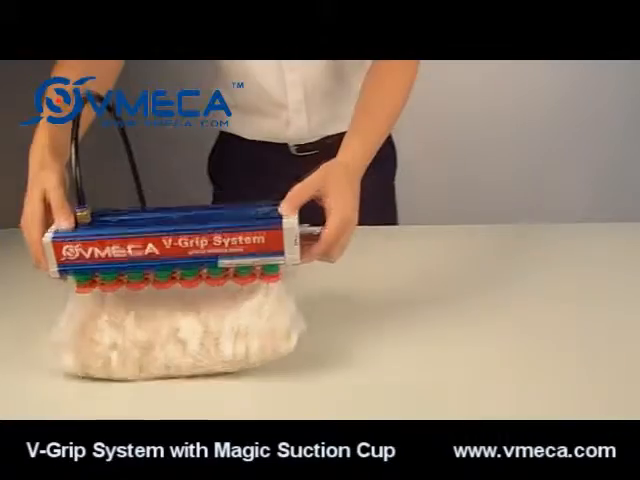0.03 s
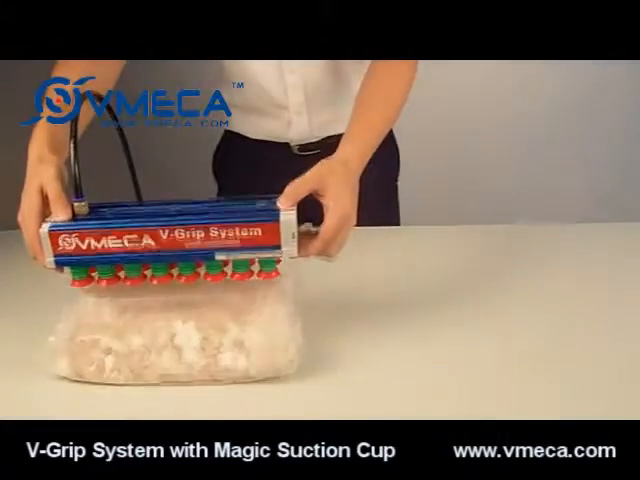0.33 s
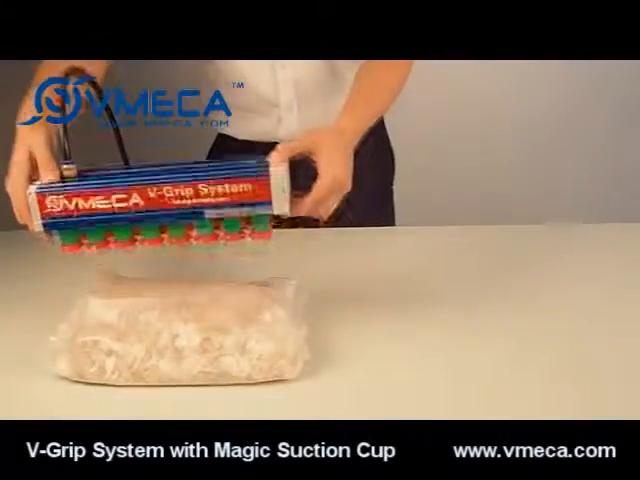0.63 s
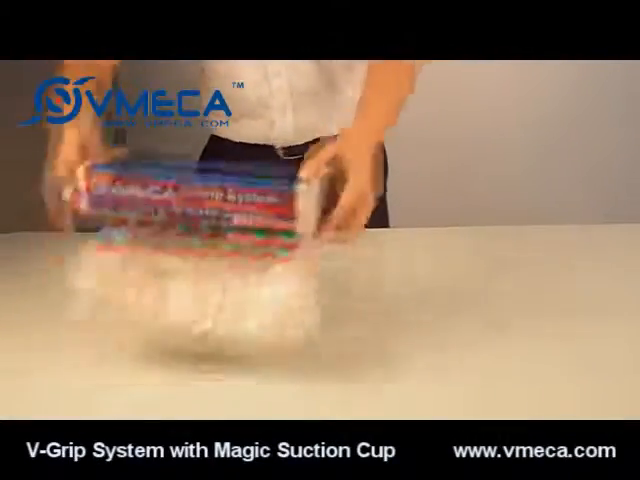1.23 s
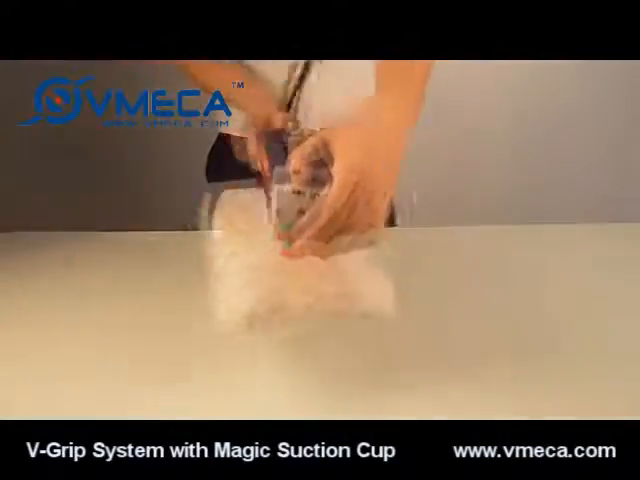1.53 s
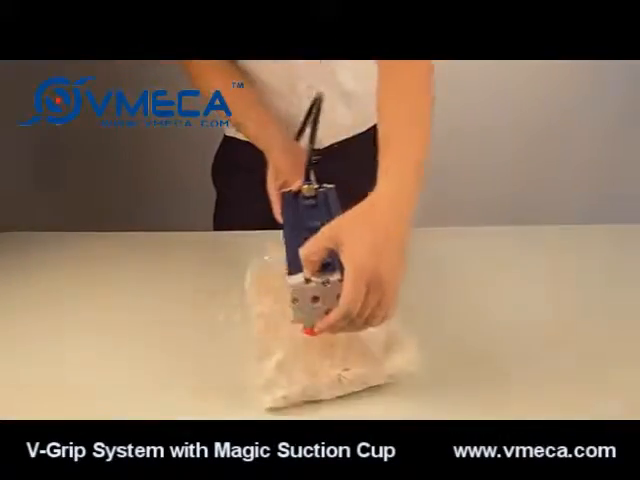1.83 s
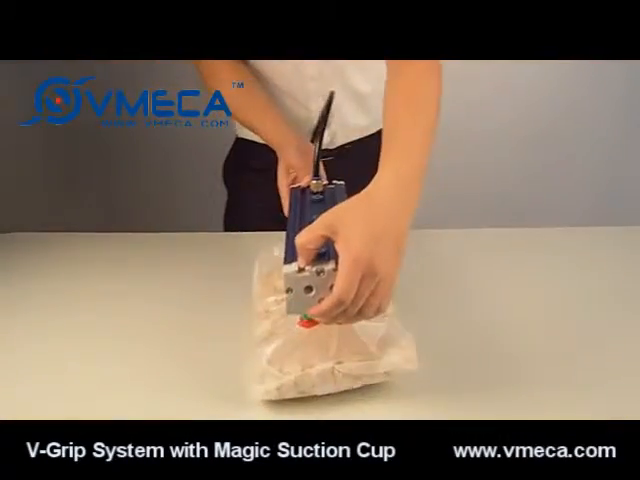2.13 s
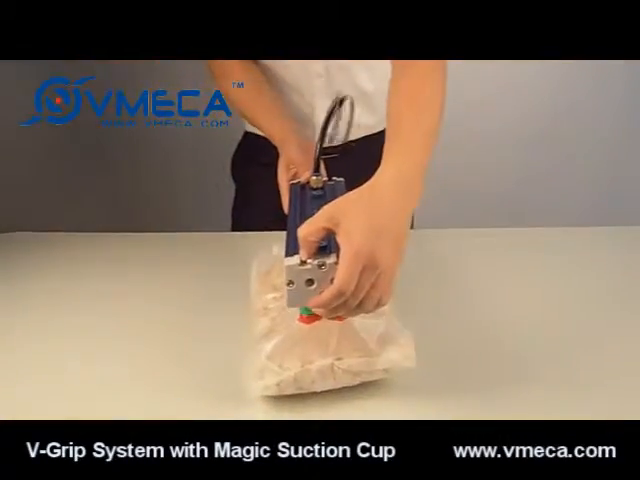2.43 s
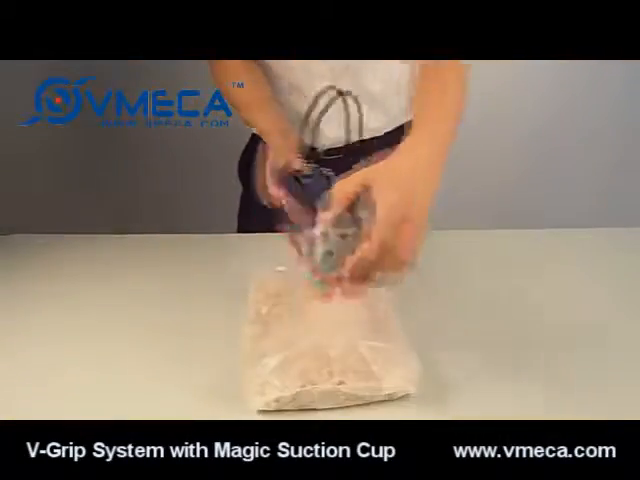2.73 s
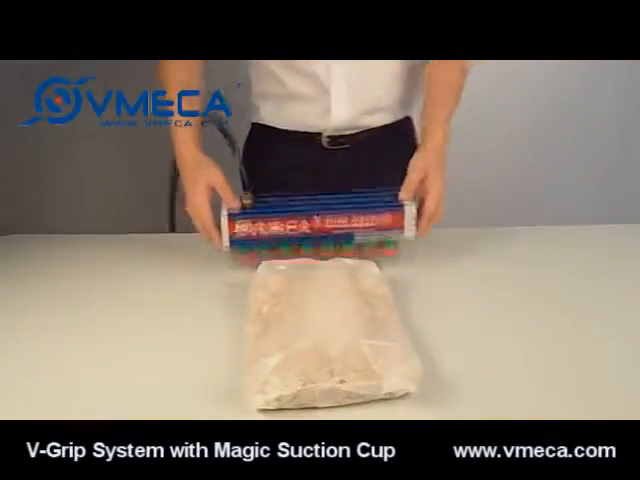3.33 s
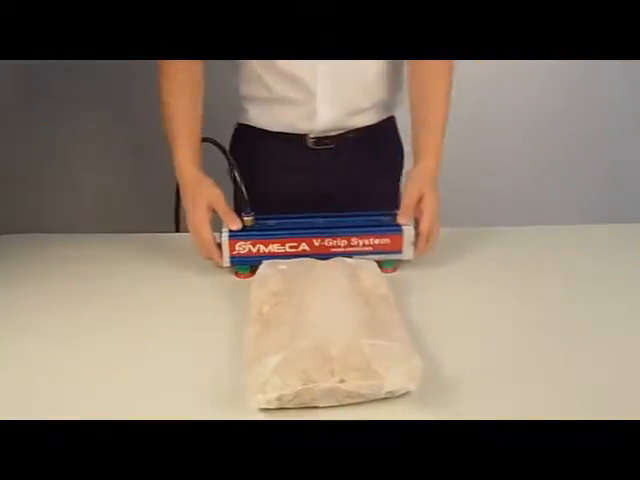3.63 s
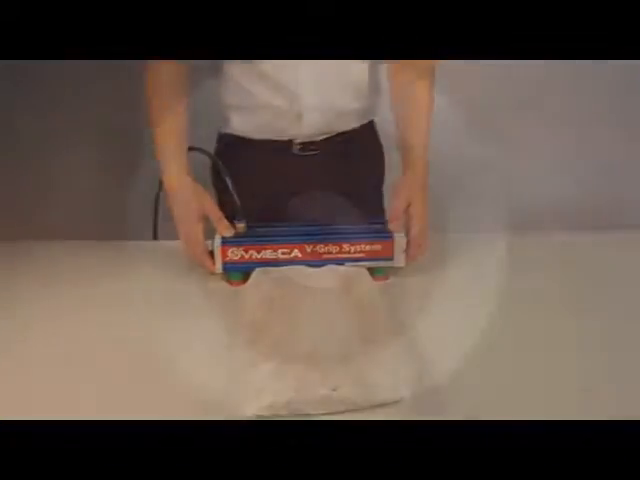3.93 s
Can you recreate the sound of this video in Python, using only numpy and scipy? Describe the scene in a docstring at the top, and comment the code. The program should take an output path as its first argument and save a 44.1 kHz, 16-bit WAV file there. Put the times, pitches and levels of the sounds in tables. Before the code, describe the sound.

Compressed air hisses loudly through a vacuum gripper, with valve puffs, clacks and plastic crinkling.

```python
"""Vacuum gripper handling a bag.

A compressed-air gripper drops a bag on a table, grips it again, turns it and lets it go.
Air rushes and whistles past the cups while they hold; at each release a valve puffs, squeals and
opens into a bright hiss. The gripper clacks on landing, plastic crinkles, the air fades to room hum."""
import sys
import numpy as np
from scipy import signal
from scipy.fft import rfft, irfft, next_fast_len
from scipy.io import wavfile
from scipy.ndimage import map_coordinates

SR = 44100
rng = np.random.default_rng(int(sys.argv[2]) if len(sys.argv) > 2 else 0)


def output_pcm(signal):
    """Save a mono or channel-first signal as 16-bit PCM at the path in sys.argv[1].

    Samples are clipped to [-1, 1] before scaling.
    """
    pcm = np.clip(np.atleast_2d(signal).T, -1, 1) * 32767
    wavfile.write(sys.argv[1], SR, np.round(pcm).astype(np.int16))


N = 176400


def suction():
    """Air rushes in between the cups and the fluttering plastic, and hoots faintly at the lip gaps."""
    # time_s, rush_db, hiss_db, treble_db
    first_grip = [(0.0, -31.5, -35, -30.5), (0.074, -31.5, -37, -30), (0.14, -29, -36, -28)]
    second_grip = [(0.93, -36, -31, -31), (0.988, -33, -32, -29.5), (1.176, -26, -26.5, -27.5),
                   (1.224, -28.5, -34, -37), (1.328, -31, -30.5, -28.5), (1.41, -34.5, -39.5, -36),
                   (1.534, -37, -43, -38), (1.708, -26.5, -33.5, -28), (1.904, -28, -32.5, -27),
                   (2.148, -30.5, -35.5, -31), (2.32, -28.5, -34.5, -28.5)]
    # start_s, end_s
    grips = [(-0.1, 0.156), (0.93, 2.34)]
    # freq_hz, density_db
    spectrum = [(70, -16.5), (200, -12), (400, -5), (700, -7.5), (1050, -1), (1700, -1), (2500, -3),
                (3000, -3.5), (3700, -4.5), (4300, -3), (5200, -6.5), (9000, -8.5), (13500, -6.5),
                (15000, -10.5)]
    # freq_hz, width_hz, peak_db
    cup_modes = [(1258, 13, -7.5), (1620, 76, -2), (1950, 32, 0)]
    # start_s, hold_s, centre_hz, width_hz, level_db
    leaks = [(-0.05, .19, 1490, 550, -33), (0.89, 0.055, 720, 340, -38), (1.68, 0.63, 2490, 240, -35.5)]
    air = close_reflections(noise(spectrum, cup_modes, grain_db=2.0))
    rush = airflow(air, [first_grip, second_grip], grips, flutter_db=0.48, flutter_hz=55)
    for start_s, hold_s, centre_hz, width_hz, level_db in leaks:
        hoot = filtered(rng.standard_normal(N), lambda hz: resonance(hz, centre_hz, width_hz))
        rush = rush + amp(level_db) * unit(hoot) * burst(start_s, 0.013, hold_s, 0.39)
    return amp(-0.5) * rush


def blow_off():
    """Air jets out through the open nozzles at each release."""
    # time_s, rush_db, hiss_db, treble_db
    first_release = [(0.2, -40, -31.5, -22.5), (0.294, -45, -34, -28), (0.45, -44, -35.5, -32),
                     (0.566, -33, -29, -27.5), (0.734, -41, -36.5, -34.5), (0.83, -38, -35, -35)]
    second_release = [(2.38, -38, -33, -24), (2.528, -45.5, -34.5, -28.5), (2.76, -35.5, -31, -29.5),
                      (2.838, -38, -34, -34), (3.006, -33.5, -31.5, -32.5), (3.36, -48, -52, -62.5),
                      (3.444, -52, -57, -82), (3.68, -74, -72, -88)]
    # start_s, end_s
    releases = [(0.188, 0.93), (2.368, 3.7)]
    # freq_hz, density_db
    spectrum = [(100, -22), (300, -11), (1500, -7), (3300, -6.5), (4200, -0.5), (4750, -2.5), (5250, 4.5),
                (8500, -4), (11700, -8.5), (13400, -7.5), (15000, -15)]
    # freq_hz, width_hz, peak_db
    nozzle_modes = [(5180, 120, -2), (5940, 70, -1), (6600, 400, -4), (9300, 400, -4)]
    air = close_reflections(noise(spectrum, nozzle_modes, grain_db=1.5))
    jet = airflow(air, [first_release, second_release], releases, flutter_db=0.54, flutter_hz=45)
    return amp(1.0) * jet


def airflow(air, tables, spans, flutter_db, flutter_hz, switch_s=0.025):
    """A valve gates the stream; its rush, hiss and treble each follow a level curve."""
    # low_hz, high_hz, core_low_hz, core_high_hz
    bands = [(1, 3300, 900, 3000), (3300, 7800, 3800, 5700), (7800, 30000, 8000, 15000)]
    t = clock()
    band_gains = out = 0
    for (start_s, end_s), table in zip(spans, tables):
        opening = np.clip(np.minimum(t - start_s, end_s - t) / switch_s + .5, 0, 1)
        band_gains = band_gains + np.sqrt(opening) * amp(curves(table))
    for gain, (low_hz, high_hz, core_low_hz, core_high_hz) in zip(band_gains, bands):
        band = filtered(air, lambda hz: rolloff(hz, high_hz, 8) - rolloff(hz, low_hz, 8))
        core = filtered(air.mean(0), lambda hz: (hz > core_low_hz) & (hz < core_high_hz))
        out = out + gain * band / core.std()
    return out * amp(flutter_db * wobble(flutter_hz))


def whistle(octave_db=-4, breath_db=-10, breath_hz=350):
    """A leaking cup lip sounds an unsteady, airy edge tone and its octave."""
    # time_s, pitch_hz, level_db
    contour = [(1.722, 6060, -43), (1.735, 6110, -32), (1.755, 6290, -37), (1.797, 6280, -32),
               (1.85, 5980, -35), (1.866, 6050, -50), (1.945, 6100, -42), (1.975, 6400, -30),
               (2.005, 6500, -28), (2.085, 6290, -35), (2.112, 6570, -34), (2.155, 6730, -37),
               (2.212, 6710, -31.5), (2.256, 6600, -41), (2.285, 6560, -34), (2.33, 6570, -39)]
    pitch_hz, level_db = curves(contour)
    start_s, end_s = contour[0][0], contour[-1][0]
    waver = 1 + 0.004 * wobble(90) + 0.0082 * wobble(900)
    phase = 2 * np.pi * np.cumsum(pitch_hz * waver) / SR
    gate = burst(start_s, .005, end_s - start_s, .02)
    breath = wobble(breath_hz) * np.sin(phase) + wobble(breath_hz) * np.cos(phase)
    tone = np.sin(phase) + amp(octave_db) * np.sin(2 * phase) + amp(breath_db) * breath
    return np.sqrt(2) * gate * amp(level_db - 1 + 2.5 * wobble(110)) * tone


def valve_puffs(seep_db=-7.5, snap_db=-4.5):
    """The vacuum breaks with a snap, a puff and a thump; air seeps until the full blow-off."""
    # start_s, level_db, thump_db
    puffs = [(0.1475, -22.5, -32), (2.3305, -21.5, -31)]
    # freq_hz, density_db
    puff_spectrum = [(200, -17), (1000, -17), (3000, -6), (7000, 7.5), (10000, 8), (15000, 2)]
    snap_spectrum = [(300, -0.5), (800, -6.5), (3800, 4.5), (6000, -4), (10000, -18)]
    thump_spectrum = [(60, -15), (200, -14), (310, 3), (450, -18.5), (900, -13), (3000, -50)]
    puff = noise(puff_spectrum, grain_db=2.5)
    snap = noise(snap_spectrum, grain_db=-0.5)
    thump = noise(thump_spectrum)
    seep = puff + amp(-2.5) * snap
    out = 0
    for start_s, level_db, thump_db in puffs:
        out += amp(level_db) * puff * burst(start_s, .002, .006, .025)
        out += amp(level_db + seep_db) * seep * burst(start_s, 0.008, .032, .06)
        out += amp(level_db + snap_db) * snap * burst(start_s, 0.00039, 0.0034, 0.011)
        out += amp(thump_db) * thump * burst(start_s, 0.0031, 0.0046, 0.21)
    return out


def valve_squeals(upper_ratio=1.5):
    """Air squeals briefly as the valve passage opens."""
    # start_s, hold_s, pitch_hz, level_db, upper_partial_db
    squeals = [(0.169, .016, 9470, -21, -22), (2.35, .018, 9400, -23.5, -6)]
    out = 0
    for start_s, hold_s, pitch_hz, level_db, upper_partial_db in squeals:
        phase = 2 * np.pi * np.cumsum(pitch_hz * (1 + 0.024 * wobble(1100))) / SR
        tone = np.sin(phase) + amp(upper_partial_db) * np.sin(upper_ratio * phase)
        gain = np.sqrt(2) * amp(level_db + 1.7 * wobble(250))
        out += gain * burst(start_s, 0.0017, hold_s, 0.055) * tone
    return out


def clacks():
    """The gripper lands in two hard contacts that ring and knock its body; the first also cracks."""
    # start_s, level_db, hold_s, t60_s, low_ring_hz, high_ring_hz, cutoff_hz
    contacts = [(0.8462, -19, .003, .085, 3900, 7500, 12200),
                (0.8812, -17.5, 0.0055, 0.055, 5500, 13700, 15100)]
    # freq_hz, density_db
    spectrum = [(150, -3), (700, -3), (1800, -10), (3300, 2), (5500, 3), (11000, -2), (13800, 7.5),
                (15000, -17)]
    # freq_hz, level_db, t60_s
    crack_modes = [(3350, -13, .005), (7450, -11.5, .005), (8600, -16, .004), (11300, -18, .004)]
    knock_modes = [(280, -34, .1), (450, -33, .07), (790, -29, .045), (1250, -32, .03)]
    out = struck(contacts[0][0], crack_modes)
    for start_s, level_db, hold_s, t60_s, low_ring_hz, high_ring_hz, cutoff_hz in contacts:
        ring = noise(spectrum, [(low_ring_hz, 450, 9), (high_ring_hz, 900, 5)])
        ring = filtered(ring, lambda hz: rolloff(hz, cutoff_hz, 12))
        out = out + amp(level_db) * ring * burst(start_s, 0.00068, hold_s, t60_s)
        out = out + struck(start_s, knock_modes)
    return out


def struck(start_s, modes):
    """One blow rings damped modes, each slightly detuned at random."""
    t = clock() - start_s
    out = 0
    for nominal_hz, level_db, t60_s in modes:
        pitch_hz = nominal_hz * (1 + .02 * rng.standard_normal())
        out += amp(level_db) * burst(start_s, .0004, .0006, t60_s) * np.sin(2 * np.pi * pitch_hz * t)
    return out


def bag():
    """The bag is pressed, lifted and set down: its filling thuds and the plastic crinkles."""
    # start_s, thud_db, crinkle_db, hold_s
    moves = [(0.82, -36.5, -37, 0.019), (1.12, -32.5, -32, 0.02), (1.163, -33.5, -25, 0.021),
             (1.313, -29.5, -22.5, 0.0043), (1.346, -37, -28, 0.0098), (1.699, -34.5, -28.5, 0.024),
             (1.885, -40, -41, 0.033), (3.724, -46.5, -44.5, 0.049), (3.784, -57, -55, 0.14)]
    # freq_hz, density_db
    thud_spectrum = [(50, -6), (130, 8), (300, 7.5), (750, 8.5), (1200, 2.5), (4000, -19)]
    crinkle_spectrum = [(300, -7.5), (1200, 1.5), (2200, 2.5), (5500, -0.5), (9000, -5), (15000, -14)]
    thud = noise(thud_spectrum)
    crinkle = noise(crinkle_spectrum, grain_db=7.5)
    out = 0
    for start_s, thud_db, crinkle_db, hold_s in moves:
        out += amp(thud_db) * thud * burst(start_s, 0.014, hold_s, 0.2)
        out += amp(crinkle_db) * crinkle * burst(start_s, 0.0036, hold_s, 0.085)
    return out


def cup_tap():
    """The idle cups touch the plastic with a light tick."""
    # start_s, level_db
    touches = [(3.7175, -34)]
    # freq_hz, density_db
    spectrum = [(400, -8), (1500, 0), (2400, 1), (3200, -9), (7000, -13), (13000, -24)]
    tick = noise(spectrum)
    return sum(amp(db) * tick * burst(start_s, .0004, .0005, t60_s=0.019) for start_s, db in touches)


def close_reflections(x, echo_db=-7.5, t60_s=0.13, cutoff_hz=6000):
    """Close reflections ripple the lower part of the air's spectrum; output at rms 1."""
    t = np.arange(SR // 8) / SR
    tail = rng.standard_normal(len(t)) * amp(-60 * t / t60_s)
    echo = signal.fftconvolve(x, tail[None] / np.linalg.norm(tail), axes=1)[:, :N]
    return unit(x + amp(echo_db) * filtered(echo, lambda hz: (1 + hz / cutoff_hz) ** -.5))


def room(x):
    """A short reverberant tail, longest in the top treble."""
    # freq_hz, t60_s
    decay = [(200, 0.15), (2000, 0.082), (12000, 0.54)]
    hz, t, frames = signal.stft(rng.standard_normal((2, SR // 2)), SR, nperseg=256)
    _, tail = signal.istft(frames * amp(-60 * t / along(decay, hz)[:, None]), SR, nperseg=256)
    return signal.fftconvolve(x, tail / np.linalg.norm(tail[0]), axes=1)[:, :N]


def room_hum():
    """Room tone and a wavering machine hum swell as the air dies away."""
    # freq_hz, density_db
    spectrum = [(30, -21), (150, -3), (300, 2), (500, -1.5), (1000, -6.5), (2000, -10), (3500, -19.5),
                (7000, -22), (13000, -27.5), (14000, -50)]
    # pitch_hz, level_db
    partials = [(97, -57.5), (246, -51.5), (313, -55), (415, -56)]
    # time_s, gain_db
    swell = [(2.7, -5.5), (3.05, -1.5)]
    hum = 0
    for pitch_hz, level_db in partials:
        gain = np.sqrt(2) * amp(level_db + 0.68 * wobble(12))
        hum += gain * np.sin(2 * np.pi * pitch_hz * clock() + 0.71 * wobble(8))
    return amp(curves(swell)[0]) * (amp(-43.5) * noise(spectrum) + hum)


def draught():
    """Gusts rumble on the microphone."""
    # time_s, level_db
    gusts = [(0, -51), (0.2, -38), (0.3, -54), (0.47, -63), (0.55, -45), (0.88, -47), (0.95, -51),
             (1.07, -63), (1.15, -48), (1.5, -46.5), (1.84, -44), (1.91, -30.5), (2.02, -52), (2.35, -42.5),
             (2.48, -50), (2.67, -49), (2.76, -39.5), (2.98, -31.5), (3.12, -44)]
    # freq_hz, density_db
    spectrum = [(15, 11.5), (50, -2.5), (75, 1), (100, -9), (140, -8), (400, -47)]
    return amp(curves(gusts)[0]) * noise(spectrum)


def noise(spectrum, modes=(), grain_db=0):
    """Stereo noise at rms 1: a broad spectrum, resonant peaks over it and a spiky grain."""
    # freq_hz, left_right_coherence
    coherence = [(40, .4), (130, .93), (1000, .97), (2500, .78), (4600, .97), (7000, .9), (10000, .6),
                 (14000, .72)]

    def response(hz):
        spread_rad = np.arccos(np.clip(along(coherence, hz), 0, .995)) / 2
        power = 1 + sum(amp(db) ** 2 * resonance(hz, mode_hz, width) for mode_hz, width, db in modes)
        return amp(along(spectrum, hz)) * np.sqrt(power) * [np.cos(spread_rad), np.sin(spread_rad)]
    grain = amp(grain_db * np.repeat(rng.standard_normal(N // 8 + 1), 8)[:N])
    mid, side = filtered(rng.standard_normal((2, N)) * grain, response)
    return unit(np.array([mid + side, mid - side]))


def burst(start_s, attack_s, hold_s, t60_s):
    """Linear rise; exponential decay from hold_s after the start."""
    t = clock() - start_s
    return np.clip(t / attack_s, 0, 1) * amp(-60 * np.maximum(t - hold_s, 0) / t60_s)


def wobble(rate_hz):
    """Smooth random curve, rate_hz knots a second."""
    return map_coordinates(rng.standard_normal(8192), [clock() * rate_hz + 4], mode="wrap")


def filtered(x, response):
    """Zero-phase filter with gain response(hz)."""
    size = next_fast_len(N + 8192)
    return irfft(rfft(x, size) * response(np.fft.rfftfreq(size, 1 / SR)), size)[..., :N]


def resonance(hz, centre_hz, width_hz):
    """Resonant peak of height 1."""
    return 1 / (1 + (2 * (hz - centre_hz) / width_hz) ** 2)


def rolloff(hz, cutoff_hz, order):
    """Low-pass gain."""
    return 1 / (1 + (hz / cutoff_hz) ** order)


def along(points, hz):
    """Interpolate (freq_hz, value) points on a log axis."""
    freq_hz, values = np.transpose(points)
    return np.interp(np.log(hz + 1), np.log(freq_hz + 1), values)


def curves(rows):
    """Interpolate each column after time_s to one value per sample."""
    time_s, *columns = np.transpose(rows)
    return [np.interp(clock(), time_s, column) for column in columns]


def clock():
    """Sample times in s."""
    return np.arange(N) / SR


def amp(db):
    """Decibels to gain."""
    return 10 ** (np.asarray(db) / 20)


def unit(x):
    """Scale to rms 1."""
    return x / np.sqrt(np.mean(x ** 2) + 1e-20)


def scene():
    """Air, tones and contacts in a small room."""
    events = whistle() + valve_puffs() + valve_squeals() + clacks() + cup_tap() + bag()
    return suction() + blow_off() + events + amp(-18) * room(events) + room_hum() + draught()


def record(dry):
    """The microphone leans a little to the right and passes nothing above its band limit."""
    # freq_hz, left_minus_right_db
    balance = [(40, -3.5), (160, -0.7), (4000, -0.5), (9000, -1.8)]
    limit_hz = 15150
    sides = np.array([[.5], [-.5]])
    return filtered(dry, lambda hz: amp(along(balance, hz) * sides) * (hz < limit_hz))


dry = scene()
out = record(dry)
output_pcm(out)
```